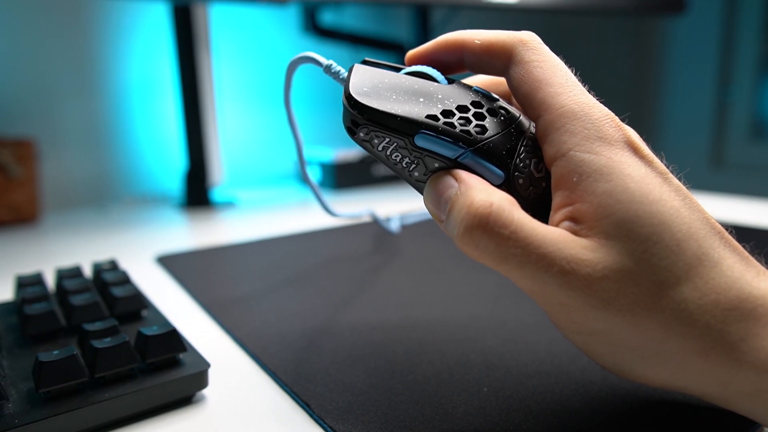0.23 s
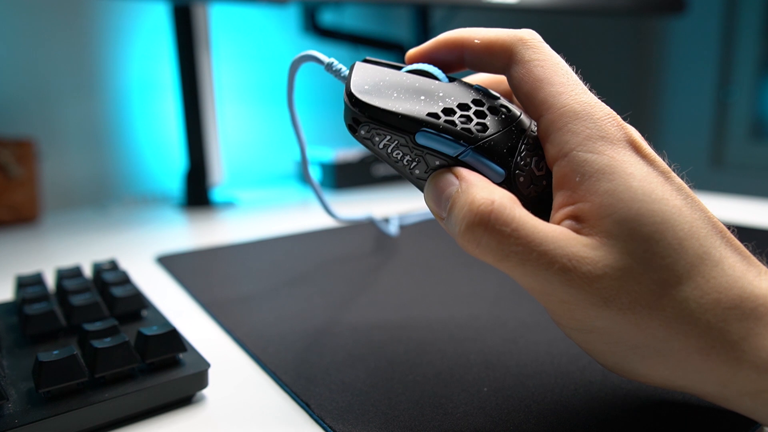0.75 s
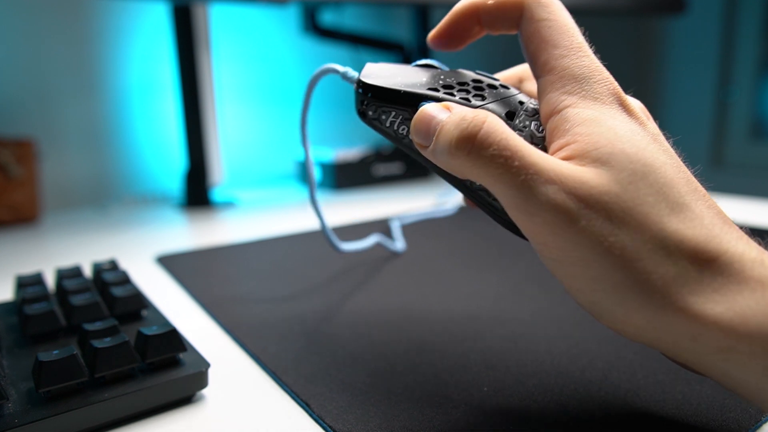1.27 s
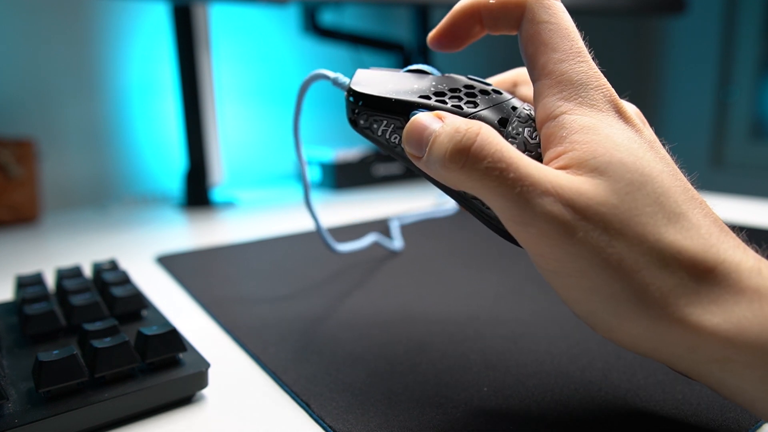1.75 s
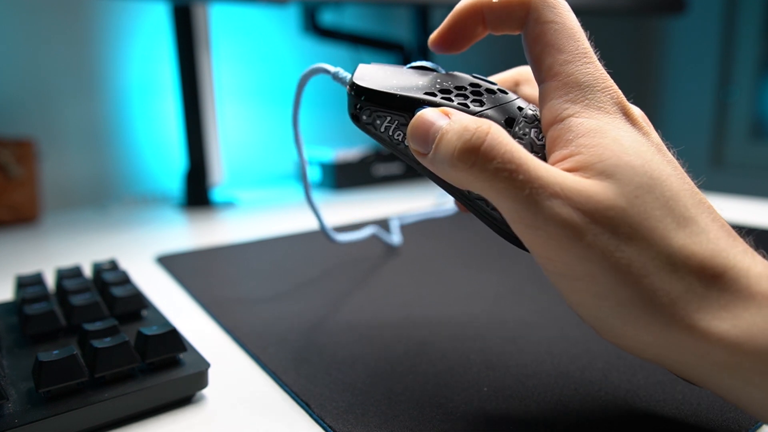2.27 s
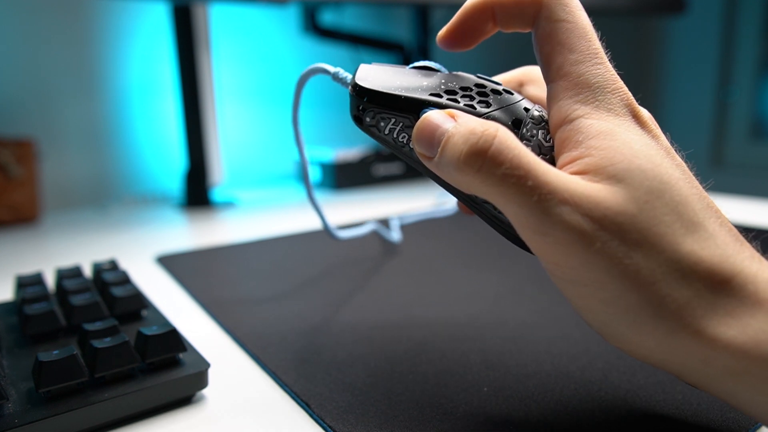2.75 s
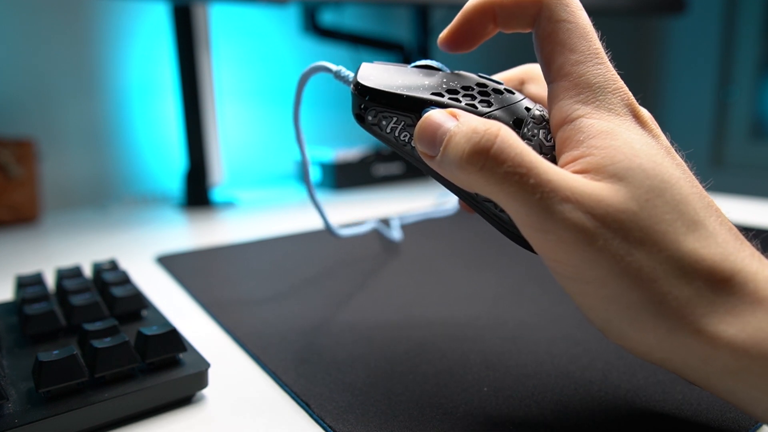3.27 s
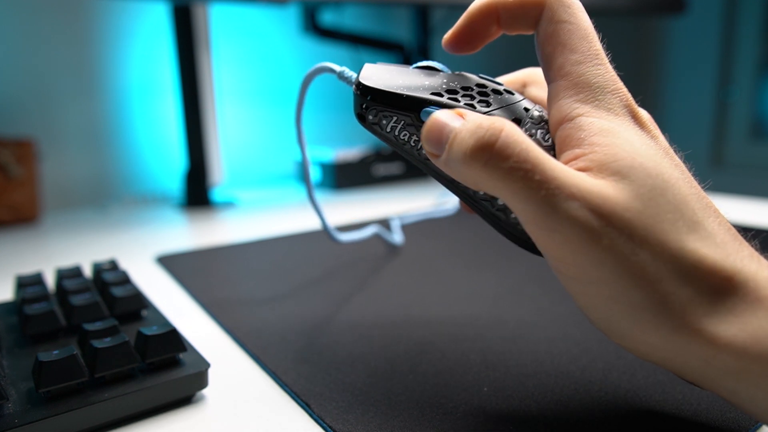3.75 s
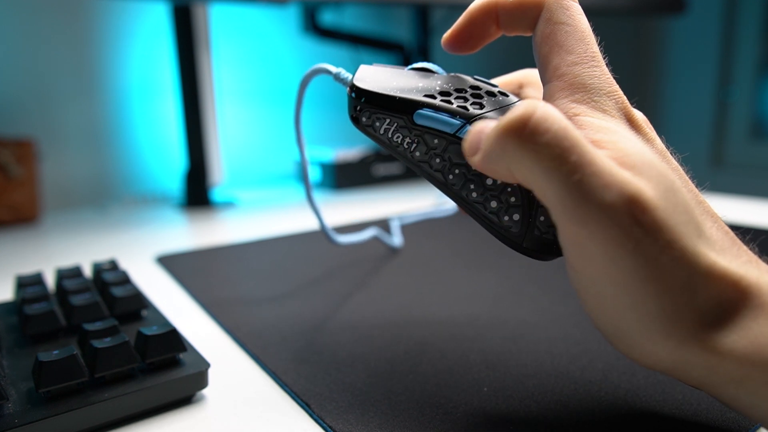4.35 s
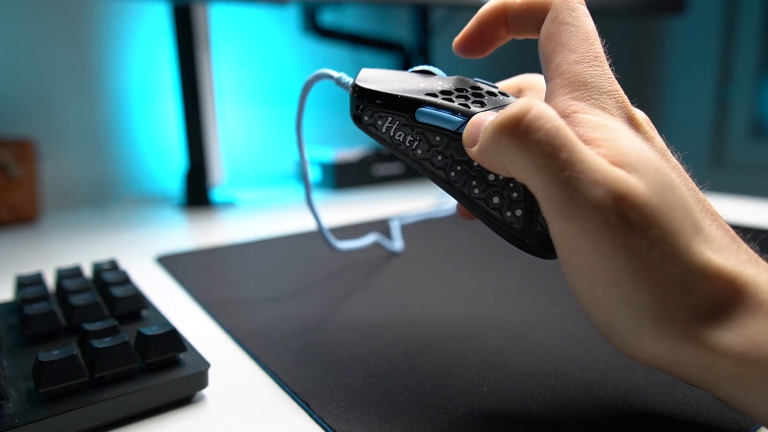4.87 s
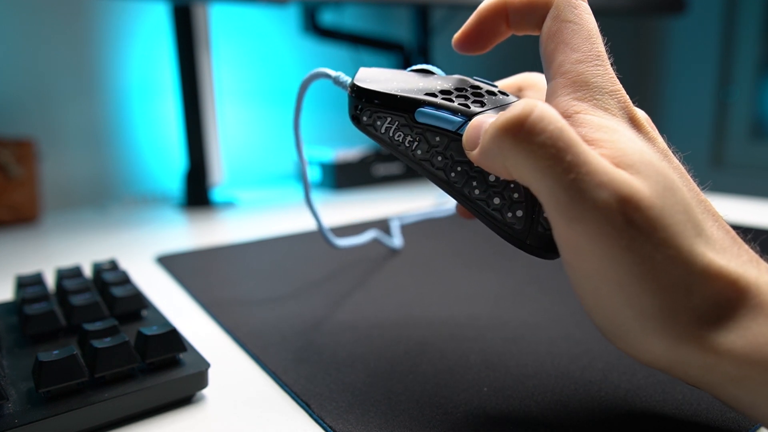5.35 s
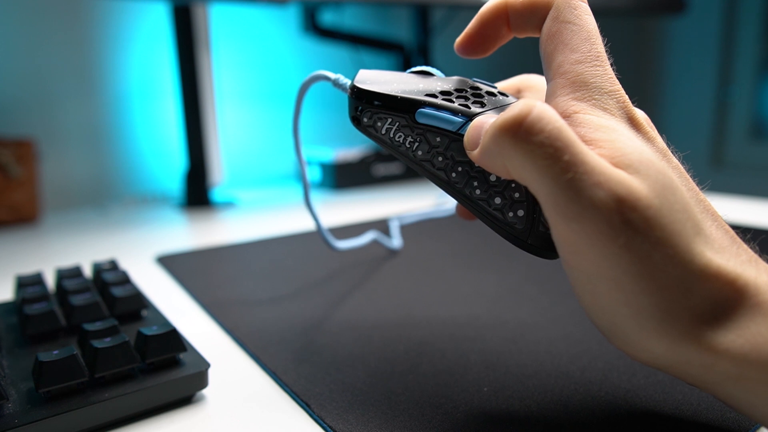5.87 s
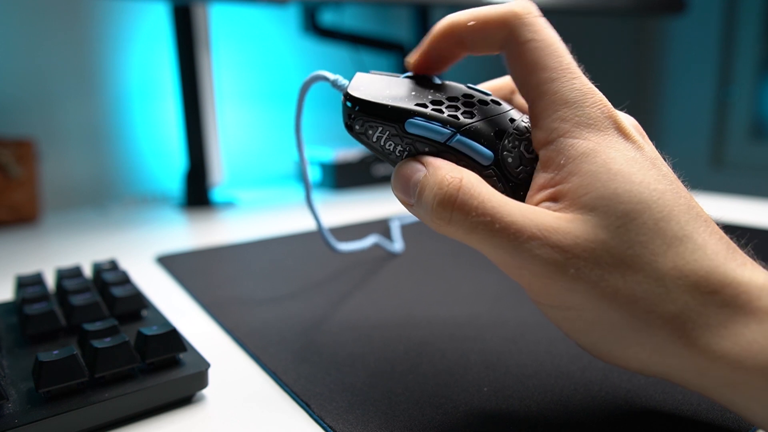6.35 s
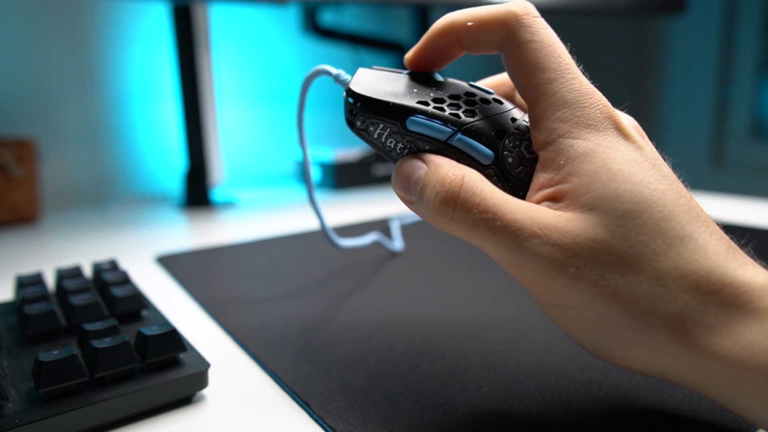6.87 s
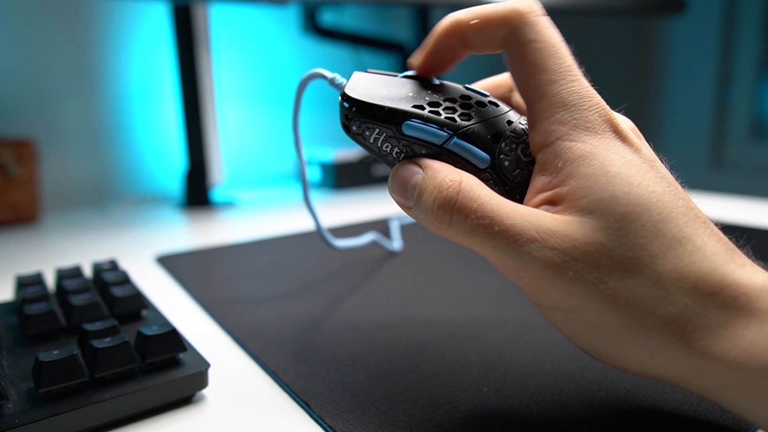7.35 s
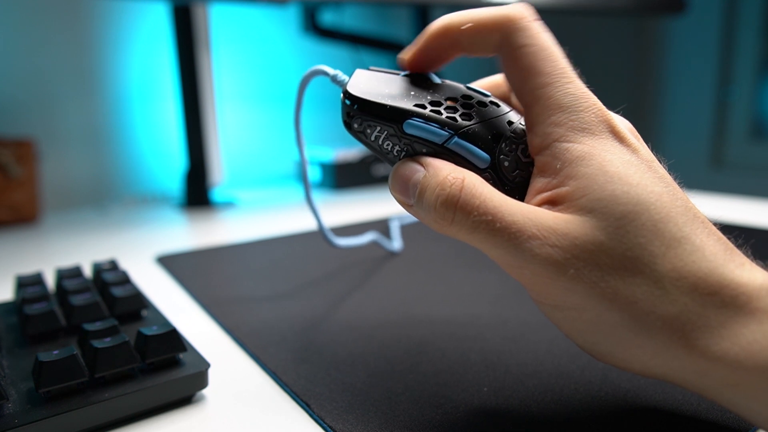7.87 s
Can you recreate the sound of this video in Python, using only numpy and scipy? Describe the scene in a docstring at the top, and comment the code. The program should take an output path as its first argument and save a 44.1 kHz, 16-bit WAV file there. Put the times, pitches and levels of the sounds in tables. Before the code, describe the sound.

Crisp, dry double clicks of a hand-held mouse, press and release, about five pairs a second, pass through three buttons with slightly different tones. Occasional dull knocks of the hollow shell and soft finger rubs sit between them. For the last two seconds the scroll wheel rattles in quick, separated little bursts. Close microphone, small room with a short echo, faint low rumble and hum beneath.

```python
"""Clicks and scrolling of a hand-held computer mouse

A hand holds a light plastic mouse close to a microphone in a small room: its right, left and thumb buttons
click down and up in turn, then a finger rolls the notched wheel in quick strokes. Bouncing contacts excite
plastic resonances, with a diffuse echo. Under them lie filtered room noise, a faint hiss, a sinusoidal hum
and a low drone like a far engine, made of two sines an octave apart."""
import sys
import numpy as np
from scipy import signal
from scipy.fft import rfft, irfft, next_fast_len
from scipy.io import wavfile
from scipy.ndimage import uniform_filter1d, map_coordinates

SR = 44100
rng = np.random.default_rng(int(sys.argv[2]) if len(sys.argv) > 2 else 0)


def store_wav(level_fs):
    """Save 16-bit WAV to argv[1]."""
    pcm = np.round(np.clip(np.atleast_2d(level_fs), -1, 1) * 32767)
    wavfile.write(sys.argv[1], SR, pcm.T.astype(np.int16))


N = 358091
TOP_HZ = 16400  # upper band limit
SIZE = 2048  # samples in one dry click
T = np.arange(SIZE) / SR
HZ = np.fft.rfftfreq(SIZE, 1 / SR)
# strength of the part of each button's bounce that is drawn anew at every click
LOOSE, SNUG = 0.8, 0.33


def amp(db):
    """Logarithmic level: decibels to amplitude gain."""
    return 10 ** (np.asarray(db) / 20)


def along(points, hz):
    """Interpolation of (Hz, value) points on a logarithmic frequency axis."""
    f, v = np.transpose(points)
    return np.interp(np.log(hz + 1), np.log(f + 1), v)


def curve(points):
    """Linear interpolation of (s, value) points, one value per sample."""
    return np.interp(np.arange(N) / SR, *np.transpose(points))


def wobble(rate):
    """Slow random modulation: a smooth curve through `rate` random knots a second."""
    knots = rng.standard_normal(int(N * rate / SR) + 4)
    return map_coordinates(knots, [np.arange(N) * rate / SR])


def filtered(x, response):
    """Linear filtering: the spectrum of x times a response of frequency."""
    m = next_fast_len(N + SR // 2)
    gain = response(np.fft.rfftfreq(m, 1 / SR))
    return irfft(rfft(x, m) * gain, m)[:N]


def add(track, s, sound):
    """Superposition: mix a sound into the track at time s."""
    part = track[max(round(s * SR), 0):][:len(sound)]
    part += sound[:len(part)]


def short_unit(x):
    """Energy normalisation: scale a click to rms 1 over five milliseconds."""
    return x / np.sqrt(np.sum(x ** 2) / (0.005 * SR) + 1e-20)


def resonances(modes, hz):
    """Modal response: steep-sided resonances whose powers add."""
    f = hz + 1
    power = 0
    for centre, width, db in modes:
        detuning = (f * f - centre * centre) / (f * width)
        power = power + (amp(db) / (1 + detuning ** 2)) ** 2
    return np.sqrt(power)


def ring(modes, blow):
    """Causality: the minimum-phase answer of a plastic part to a blow."""
    gain = resonances(modes, HZ) / np.sqrt(1 + (HZ / TOP_HZ) ** 20)
    cepstrum = irfft(np.log(gain + 1e-6))
    # folding the cepstrum onto positive times gives minimum phase
    fold = np.r_[1, np.full(SIZE // 2 - 1, 2), 1, np.zeros(SIZE // 2 - 1)]
    response = np.exp(rfft(cepstrum * fold))
    return short_unit(irfft(response * rfft(blow)))


def chatter(length, t60, count=6):
    """Contact bounce: noise at full strength for `length` s, then exponential decay over t60 s."""
    onset = 1 - np.exp(-(np.arange(SIZE) + 1) / 10)
    shape = amp(-60 * np.maximum(T - length, 0) / t60) * onset
    blow = shape * rng.standard_normal(SIZE)
    # each pass evens out the spectrum, then restores the envelope
    for _ in range(count):
        blow = irfft(np.exp(1j * np.angle(rfft(blow))))
        local_power = np.abs(uniform_filter1d(blow ** 2, size=40))
        blow = blow * shape / np.sqrt(local_power + 1e-12)
    return short_unit(blow)


# Decay of the small room. Each row: frequency in Hz, reverberation time t60 in seconds.
ROOM_DECAY = [(500, 0.12), (2000, 0.29), (6000, 0.24), (14000, 0.16)]


def room_tail():
    """Diffuse reverberation: decaying noise of unit energy that builds up as the first walls answer."""
    hz, t, z = signal.stft(rng.standard_normal(SR // 3), SR, nperseg=256)
    decay = amp(-60 * t / along(ROOM_DECAY, hz)[:, None])
    tail = signal.istft(z * decay, SR, nperseg=256)[1]
    tail = tail * np.clip(np.arange(len(tail)) / SR / 0.002, 0, 1)
    return tail / np.linalg.norm(tail)


def strike(modes, blow, wet_db, blur=2.94):
    """Direct and diffuse sound: the echo gathers all sides of a part, so its mode widths scale by blur."""
    all_round = ring(np.array(modes) * [1, blur, 1], blow)
    sound = amp(wet_db) * signal.fftconvolve(all_round, room_tail())
    sound[:SIZE] += ring(modes, blow)
    return sound


# Spectrum of the room noise. Each row: frequency in Hz, relative density in dB per Hz.
AIR_SPECTRUM = [(12, -32), (20, 1), (55, -1.5), (204, 0.5), (347, -11.5), (422, -8), (607, -20),
                (1330, -21), (1860, -33), (3530, -31.5), (4810, -32), (7310, -31.5), (8180, -37),
                (14700, -39.5), (16000, -42)]
AIR_DB = -63  # rms level of the whole


def room_noise():
    """Stationary noise: a steady rumble of filtered white noise."""
    noise = filtered(rng.standard_normal(N), lambda hz: amp(along(AIR_SPECTRUM, hz)))
    return amp(AIR_DB) * noise / noise.std()


# Faint hum in the room. Each row: frequency in Hz about which the phase drifts, rms level in dB.
HUM_TONES = [(215.3, -75), (479, -84.5), (791, -89)]


def hum(drift=0.63):
    """Phase modulation: steady tones whose phases wander by about `drift` radians."""
    t = np.arange(N) / SR
    total = np.zeros(N)
    for hz, db in HUM_TONES:
        phase = 2 * np.pi * hz * t + drift * wobble(rate=8)
        total += amp(db) * np.sqrt(2) * np.sin(phase)
    return total


# Band of the faint hiss. Each row: centre in Hz, width in Hz, relative level in dB.
HISS_MODES = [(1630, 500, 0)]
# Loudness of the hiss. Each row: time in seconds, rms level in dB.
HISS_FADE = [(0, -81), (.46, -77), (1.07, -81.5), (1.5, -92), (2.5, -110)]


def hiss():
    """Band-pass noise: a faint narrow hiss that soon fades out."""
    noise = filtered(rng.standard_normal(N), lambda hz: resonances(HISS_MODES, hz))
    return amp(curve(HISS_FADE)) * noise / noise.std()


# Speed of the far engine. Each row: time in seconds, upper-order pitch in Hz before phase wobble.
ENGINE_PITCH = [(0, 82.5), (.22, 82.8), (.38, 91.5), (.8, 96), (1.25, 100), (2.3, 100.5)]
# Strength of the upper order. Each row: time in seconds, rms level in dB before wavering.
UPPER_ORDER_LEVEL = [(0, -64), (.13, -49.5), (.4, -48.5), (.54, -46.5), (.605, -69), (.65, -52.5),
                     (1.05, -57.5), (1.22, -72), (2.1, -70.5), (2.3, -65), (2.6, -75)]
# Strength of the order an octave below. Each row: time in seconds, rms level in dB before wavering.
LOWER_ORDER_LEVEL = [(0, -63), (.5, -59), (.68, -67), (.78, -55), (1.15, -61), (1.9, -62), (2.33, -72),
                     (3.3, -70), (4.2, -80)]


def drone(waver_db=0.5, unsteady=0.36):
    """Engine orders: two phase-locked sines rise as a far engine picks up speed, and fade away."""
    phase = 2 * np.pi * np.cumsum(curve(ENGINE_PITCH)) / SR
    phase = phase + unsteady * wobble(rate=9.8)  # radians
    upper = amp(curve(UPPER_ORDER_LEVEL) + waver_db * wobble(rate=9)) * np.sin(phase)
    lower = amp(curve(LOWER_ORDER_LEVEL) + waver_db * wobble(rate=6.4)) * np.sin(phase / 2)
    return np.sqrt(2) * (upper + lower)


def evenly(times, db):
    """Equal excitation: (s, dB) rows for clicks of one strength."""
    return [(s, db) for s in np.ravel(times)]


def switch(clicks, modes, gain_db, length, t60, variety, wet_db, blur, lag,
           split_hz=4800, impact_delay=0.000504):
    """Snap-through: a leaf spring flips, bounces nearly the same way each time and rings its button."""
    track = np.zeros(N)
    habit = chatter(length, t60)
    # one compact impact drives the low modes; a spread of light bounces around it drives the treble
    low_share = 1 / (1 + (HZ / split_hz) ** 10)
    impact = np.sqrt(np.sum(habit ** 2)) * np.exp(-2j * np.pi * HZ * impact_delay)
    habit = irfft(np.sqrt(low_share) * impact + np.sqrt(1 - low_share) * rfft(habit))
    for s, db in clicks:
        blow = habit + variety * chatter(length, t60)
        add(track, s + lag, amp(db + gain_db) * strike(modes, blow, wet_db, blur))
    return track


# Right-button clicks down, then up. Each row: time in seconds before the lag, level in dB before gain_db.
RIGHT_PRESS_CLICKS = [(0.0515, -27.5), (0.2719, -30.5), (0.4729, -29.5), (0.6393, -27.5), (0.826, -27.5),
                      (0.9771, -31), (1.1069, -26)]
RIGHT_RELEASE_CLICKS = [(0.1241, -27.5), (0.3768, -30), (0.5387, -29.5), (0.745, -33), (0.8966, -31.5),
                        (1.0235, -31.5)]
# Resonances of the right button down, then up. Each row: centre in Hz, width in Hz, relative level in dB.
RIGHT_DOWN_MODES = [(1350, 550, -19.5), (2590, 230, -13.5), (3430, 490, -13.5), (4460, 3500, -25.5),
                    (6230, 1060, -7.5), (6540, 200, -6), (6730, 380, -4.5), (7490, 400, -1.5),
                    (8380, 580, -10.5), (9880, 490, -13), (11200, 740, -16), (12900, 770, -17),
                    (14700, 530, -15)]
RIGHT_UP_MODES = [(1390, 980, -18.5), (2860, 460, -15.5), (3530, 280, -11.5), (4110, 290, -13),
                  (5830, 1060, -4), (6000, 330, -13), (6710, 620, 0), (7750, 2600, -15), (10300, 2200, -18),
                  (12000, 660, -14), (14580, 710, -19)]


def right_button():
    """Change of boundary conditions: the button rings differently when the finger lets go."""
    down = switch(RIGHT_PRESS_CLICKS, RIGHT_DOWN_MODES, gain_db=-8.5, length=0.0018, t60=0.017,
                  variety=LOOSE, wet_db=-14.5, blur=3.5, lag=0.0001)
    up = switch(RIGHT_RELEASE_CLICKS, RIGHT_UP_MODES, gain_db=-9.5, length=0.00015, t60=0.016,
                variety=LOOSE, wet_db=-17.0, blur=3.5, lag=0.00033)
    return down + up


# Resonances of fingers and plastic around a click. Each row: centre in Hz, width in Hz, relative level in dB.
GRIP_MODES = [(736, 160, -10), (1180, 650, -3), (2670, 1500, -10.5)]


def nudges(times, level_db, delay, scatter):
    """Damped contact: a finger shifts softly on its button, at a slightly random time and force."""
    track = np.zeros(N)
    spread_db = 3
    for s, (when, force) in zip(times, rng.standard_normal((len(times), 2))):
        nudge = strike(GRIP_MODES, chatter(length=0.0065, t60=0.043), wet_db=-20, blur=0.6)
        add(track, s + delay + scatter * when, amp(level_db + spread_db * force) * nudge)
    return track


def fingers():
    """Contact friction: fingertips settle after releases; the thumb takes up slack and rubs after clicks."""
    releases = [s for s, _ in RIGHT_RELEASE_CLICKS] + list(LEFT_RELEASE_TIMES)
    thumb_down, thumb_up = np.transpose(THUMB_TIMES)
    settle = nudges(releases, level_db=-64, delay=0.0093, scatter=0.011)
    slack = nudges(thumb_down, level_db=-63, delay=-0.0095, scatter=0.00287)
    rub_down = nudges(thumb_down, level_db=-63.5, delay=0.026, scatter=0.0042)
    rub_up = nudges(thumb_up, level_db=-62, delay=0.016, scatter=0.006)
    return settle + slack + rub_down + rub_up


# Dull knocks against the shell. Each row: time in seconds, level in dB before an offset, pitch in Hz.
SHELL_KNOCKS = [(1.125, -49.5, 1417), (1.19, -57.5, 1090), (1.22, -54, 1010), (3.585, -35.5, 1410),
                (3.63, -49, 1190), (3.794, -41, 2160), (3.798, -41, 1315), (4.017, -57.5, 1200),
                (4.172, -47.5, 1370), (4.256, -53, 1200), (4.278, -55, 1080), (4.38, -48, 1370),
                (4.456, -55, 1580), (4.471, -45, 1150), (4.497, -54, 1120), (4.595, -43.5, 1430),
                (4.785, -52, 1480), (4.998, -52, 1400), (5.214, -50.5, 1440), (5.276, -56.5, 1110),
                (7.085, -50.5, 1420), (7.604, -54.5, 1430)]
# Resonances of the shell before retuning. Each row: centre in Hz, width in Hz, relative level in dB.
SHELL_MODES = [(787, 210, -16.5), (1353, 340, -5), (2180, 1400, -18.5), (2955, 170, -11), (4130, 990, -21),
               (6600, 3100, -24.5)]


def knocks():
    """Cavity resonance: a button or the wheel meets its stop in a hollow shell tuned by the grip."""
    track = np.zeros(N)
    main_hz = max(SHELL_MODES, key=lambda mode: mode[2])[0]
    for s, db, hz in SHELL_KNOCKS:
        modes = np.array(SHELL_MODES) * [hz / main_hz, 1, 1]
        thud = strike(modes, chatter(length=0.0024, t60=0.026), wet_db=-11, blur=0.81)
        add(track, s, amp(db - 3.5) * thud)
    return track


# Left-button clicks down, then up. Each entry: time in seconds before the lag.
LEFT_PRESS_TIMES = [1.1433, 1.3281, 1.5478, 1.7868, 1.9854, 2.178, 2.3572, 2.5658, 2.7559, 2.956, 3.1258,
                    3.3274, 3.5336, 3.7597]
LEFT_RELEASE_TIMES = [1.2116, 1.4097, 1.6209, 1.8656, 2.0482, 2.2536, 2.4364, 2.645, 2.8408, 3.031, 3.2136,
                      3.4309, 3.6352]
# Resonances of the left button down, then up. Each row: centre in Hz, width in Hz, relative level in dB.
LEFT_DOWN_MODES = [(740, 187, -15.5), (1466, 164, -15), (2960, 1900, -20), (3530, 230, -10.5),
                   (4270, 490, 3.5), (5230, 440, -8.5), (6500, 800, -2.5), (7020, 170, -0.5),
                   (7840, 420, -1.5), (9100, 4100, -16), (11000, 630, -6.5), (13700, 1400, -11),
                   (13050, 340, -2)]
LEFT_UP_MODES = [(770, 140, -13), (1170, 460, -19.5), (2660, 1050, -15), (3540, 170, -9.5), (4510, 330, -3),
                 (5080, 1050, -6.5), (6330, 1500, -6.5), (7110, 200, 4), (7720, 400, 1), (8610, 530, -3.5),
                 (10500, 3800, -13), (13800, 700, -2), (14500, 1100, -20)]


def left_button():
    """Repeatable snap-through: every click in one direction is equally hard, with one set of modes down and
    another up."""
    down = switch(evenly(LEFT_PRESS_TIMES, -24.5), LEFT_DOWN_MODES, gain_db=-10.5, length=0.0016, t60=0.012,
                  variety=SNUG, wet_db=-14, blur=2.5, lag=0.00019)
    up = switch(evenly(LEFT_RELEASE_TIMES, -25.7), LEFT_UP_MODES, gain_db=-11.5, length=0.00051, t60=0.016,
                variety=SNUG, wet_db=-13.5, blur=1.5, lag=0.00027)
    return down + up


# Thumb-button clicks. Each row: press in seconds, release in seconds, both before the lag.
THUMB_TIMES = [(4.0549, 4.1655), (4.2472, 4.367), (4.4668, 4.5877), (4.6578, 4.7589), (4.8794, 4.9833),
               (5.0749, 5.188), (5.2897, 5.3673), (5.4453, 5.565), (5.6313, 5.7536), (5.8239, 5.9332)]
# Resonances of the thumb button. Each row: centre in Hz, width in Hz, relative level in dB.
THUMB_MODES = [(772, 75, -15.5), (1354, 220, -17.5), (2980, 1680, -12), (3960, 550, -8), (4550, 300, -12),
               (5740, 1760, -13), (6530, 530, 2), (6800, 290, -13), (7490, 310, -6), (10770, 6300, -15),
               (11600, 1070, -6), (13700, 2000, -18), (14700, 1400, -12)]


def thumb_button():
    """Symmetric snap-through: the same modes and strength for press and release."""
    return switch(evenly(THUMB_TIMES, -24.5), THUMB_MODES, gain_db=-11, length=0.00102, t60=0.016,
                  variety=SNUG, wet_db=-14.5, blur=2.9, lag=0.0004)


def touch():
    """Impulsive contact: the finger lands on the wheel with one very short, bright, dry tick."""
    track = np.zeros(N)
    touch_s, touch_db = 6.022, -31.5  # time in s, peak level in dB
    tick = strike([(4950, 21000, 0)], chatter(length=0.0001, t60=0.0015), wet_db=-16)
    add(track, touch_s, amp(touch_db) * tick / np.abs(tick).max())
    return track


# Finger strokes on the wheel. Each row: first notch in seconds, last notch in seconds, notch count,
# speeding up (-1 to 1), rush in mid-stroke (-1 to 1), level at the hardest push in dB before tooth scatter
# and gain_db, place of that push (0 to 1), fall in dB a whole stroke away from it,
# snap over knock in dB before the dulling by level.
WHEEL_STROKES = [(6.022, 6.074, 6.0, -0.29, -0.004, -45, 0.14, 16, -2.5),
                 (6.113, 6.1964, 11.0, -0.29, 0.15, -53.5, 1.0, 3.5, -1.5),
                 (6.2374, 6.318, 11.0, -0.14, 0.21, -42.5, 0.63, 18.0, -3),
                 (6.3793, 6.4405, 6.0, 0.36, 0.21, -49, 0.0, 4.5, -1.5),
                 (6.5206, 6.5837, 6.0, -0.3, 0.35, -39.5, 0.52, 22.5, -4),
                 (6.6264, 6.7074, 6.0, -0.013, 0.2, -42.5, 0.52, 16.5, -3.5),
                 (6.7644, 6.8207, 9.0, -0.4, 0.46, -39.5, 0.5, 18.5, -4.5),
                 (6.8704, 6.9182, 5.0, 0.28, 0.37, -46, 0.94, 13, -3.5),
                 (6.977, 7.0337, 7.0, -0.16, -0.3, -52.5, 0.3, 1, -6.5),
                 (7.102, 7.1594, 6.0, 0.049, 0.11, -46.5, 0.76, 11, -1.5),
                 (7.2404, 7.3163, 9.0, -0.043, 0.04, -44, 0.65, 13, -5.5),
                 (7.376, 7.4419, 7.0, 0.29, 0.24, -46.5, 1.0, 8, -3.0),
                 (7.4978, 7.5761, 8.0, -0.18, 0.16, -43, 0.44, 16.5, -6.0),
                 (7.6317, 7.6823, 6.0, -0.24, -0.19, -41.5, 1.0, 15, -3.5),
                 (7.756, 7.801, 7.0, -0.022, 0.16, -41.5, 0.2, 8.5, -3.5),
                 (7.881, 7.9455, 8.0, -0.31, 0.13, -43.5, 1, 9, -5),
                 (8.0121, 8.07, 6.0, -0.14, 0.04, -47, 0.0, 1.5, -5.5)]


def notches(coast_count=2):
    """Driven and free rotation: (s, dB, snap dB) of notches under the finger, then of the coasting wheel."""
    push_shape = 0.58  # below 1, the level falls fastest right beside the hardest push
    tooth_db, tooth_s = 2.3, 0.0004  # scatter of the teeth in strength and spacing
    coast_s, coast_loss_db = 0.0079, 10  # spacing and loss of each coasting notch
    rows = []
    for start, end, count, speed_up, rush, db, push, fall_db, snap_db in WHEEL_STROKES:
        turn = np.linspace(0, 1, round(count))
        when = turn + speed_up * np.sin(np.pi * turn) / np.pi
        when = when + rush * np.sin(2 * np.pi * turn) / (2 * np.pi)
        times = start + (end - start) * when + rng.normal(0, tooth_s, len(turn))
        levels = db - fall_db * np.abs(turn - push) ** push_shape + rng.normal(0, tooth_db, len(turn))
        rows += [(s, level, snap_db) for s, level in zip(times, levels)]
        for k in range(1, coast_count + 1):
            rows.append((end + k * coast_s, levels[-1] - k * coast_loss_db, snap_db))
    return rows


# Resonances of the wheel. Each row: centre in Hz, width in Hz, relative level in dB before tooth colour.
WHEEL_MODES = [(452, 100, -8), (802, 440, -5), (1253, 415, 0.5), (1440, 230, 2.5), (1965, 150, -9),
               (2675, 610, -7.5), (3567, 400, -5.5), (4365, 350, -10), (5700, 4200, -16),
               (7260, 1150, -15.5), (10900, 1100, -25.5)]


def wheel_rub(clicks, rub_db=-9, rub_time=0.007, lead=0.0075):
    """Friction noise: the detent scrapes up each tooth before it drops and rubs on, harder with the stroke."""
    keep = np.exp(-1 / (rub_time * SR))
    effort = np.sqrt(signal.lfilter([1 - keep], [1, -keep], clicks ** 2))
    # the scrape leads the click by `lead` seconds
    effort = np.interp(np.arange(N) + lead * SR, np.arange(N), effort)
    grain_db = 4 * np.repeat(rng.standard_normal(N // 64 + 1), 64)[:N]
    grit = rng.standard_normal(N) * amp(grain_db)
    rub = filtered(grit, lambda hz: resonances(WHEEL_MODES, hz))
    return amp(rub_db) * effort * rub / rub.std()


def wheel(gain_db=-3, colour_db=1.0, dull_per_db=0.3047, usual_db=-51):
    """Detent impact: each notch gives a bright snap and the wheel's low knock; the axle rubs between."""
    track = np.zeros(N)
    split_hz = 2200
    for s, db, snap_db in notches():
        # no two teeth are alike, so each rings the modes at new strengths
        colour = rng.normal(0, colour_db, len(WHEEL_MODES))
        modes = np.array(WHEEL_MODES) + np.outer(colour, [0, 0, 1])
        low = modes[:, 0] < split_hz
        knock = strike(modes[low], chatter(length=0.00062, t60=0.023, count=1), wet_db=-13.0, blur=1.24)
        snap = strike(modes[~low], chatter(length=0.0004, t60=0.024, count=0), wet_db=-15.5, blur=1.9)
        # a harder push adds more to the knock than to the snap
        snap_gain = amp(snap_db - dull_per_db * (db - usual_db))
        add(track, s, amp(db + gain_db) * (knock + snap_gain * snap))
    return track + wheel_rub(track)


def scene():
    """Superposition of the mouse and the room's background, in mono."""
    background = room_noise() + hum() + hiss() + drone()
    buttons = right_button() + left_button() + thumb_button()
    return (background + buttons + fingers() + knocks() + touch() + wheel())[None]


def record(dry):
    """Band limitation: the recorder cuts off steeply above TOP_HZ."""
    return filtered(dry[0], lambda hz: 1 / np.sqrt(1 + (hz / TOP_HZ) ** 160))[None]


dry = scene()
out = record(dry)
store_wav(out)
```